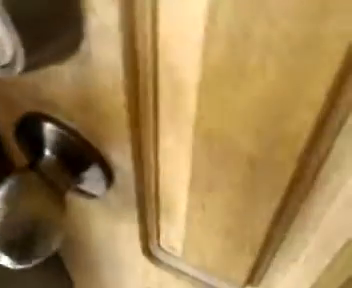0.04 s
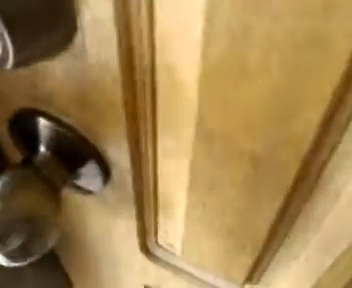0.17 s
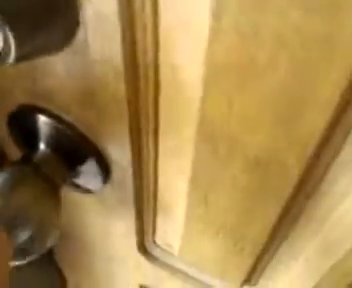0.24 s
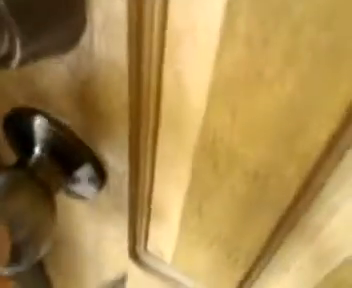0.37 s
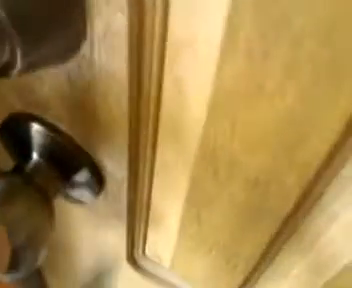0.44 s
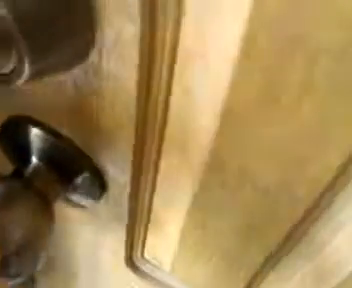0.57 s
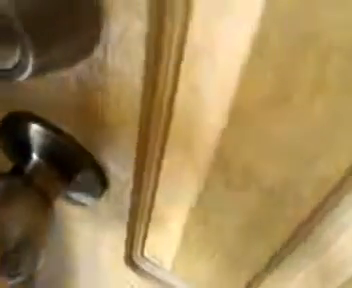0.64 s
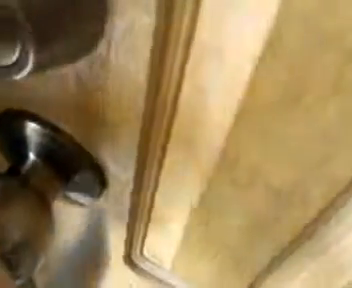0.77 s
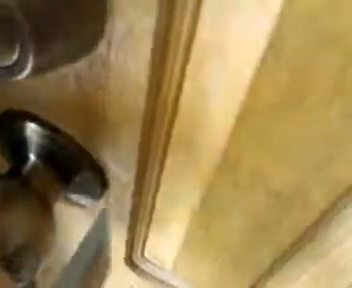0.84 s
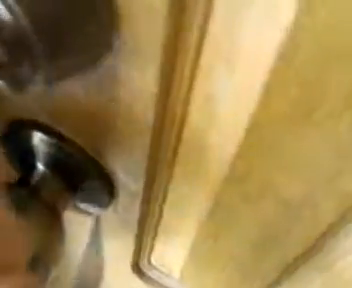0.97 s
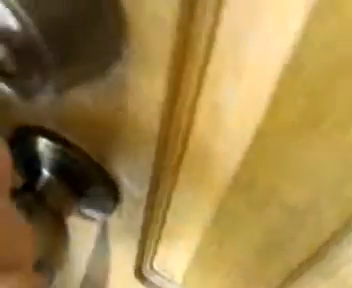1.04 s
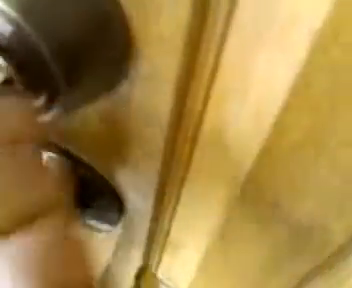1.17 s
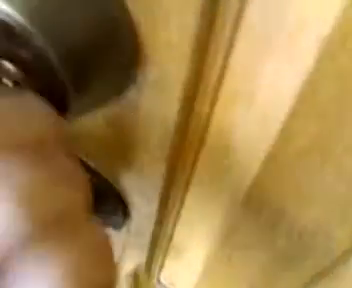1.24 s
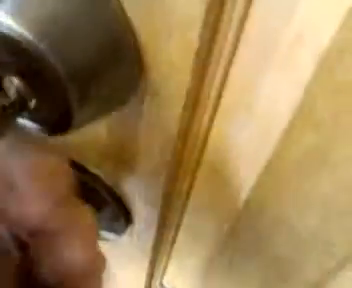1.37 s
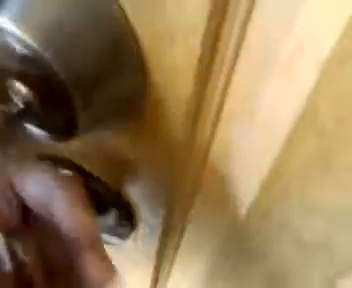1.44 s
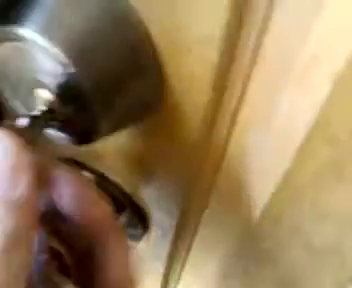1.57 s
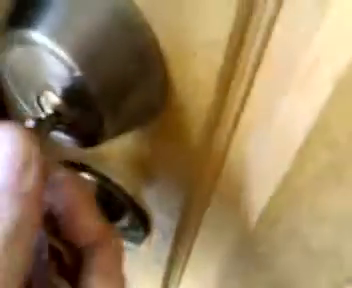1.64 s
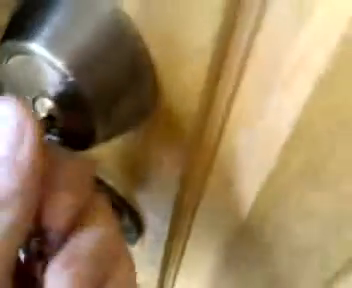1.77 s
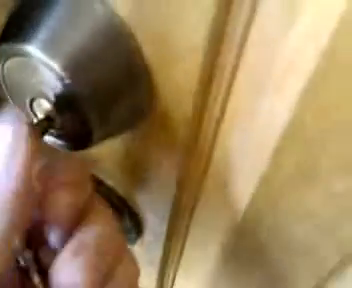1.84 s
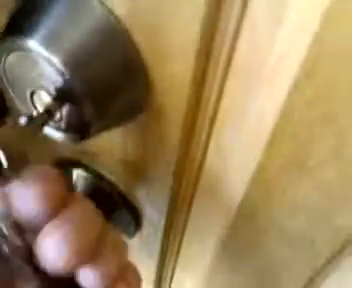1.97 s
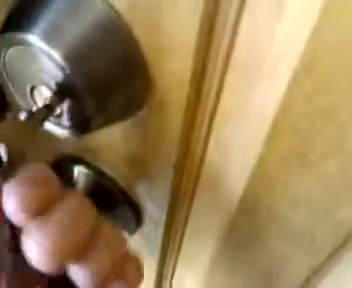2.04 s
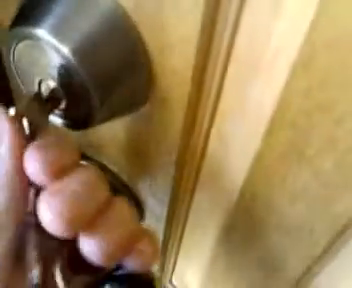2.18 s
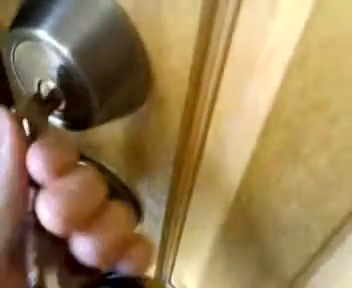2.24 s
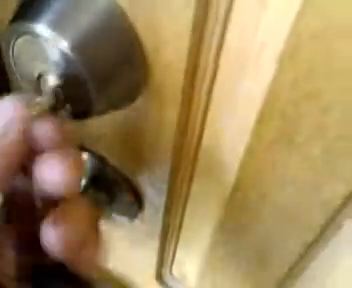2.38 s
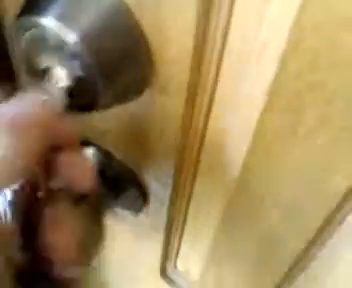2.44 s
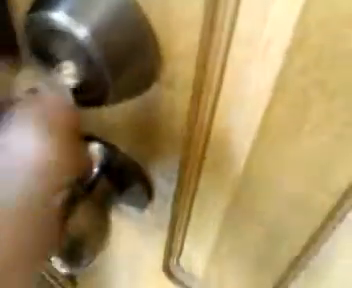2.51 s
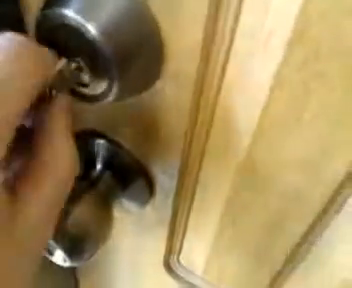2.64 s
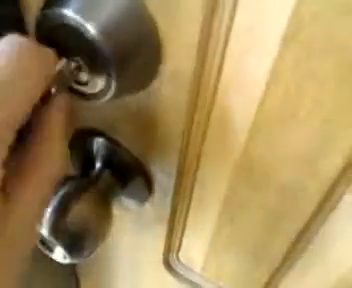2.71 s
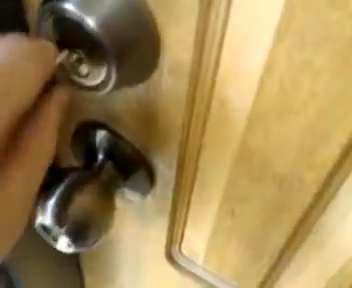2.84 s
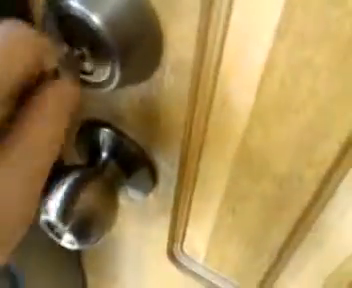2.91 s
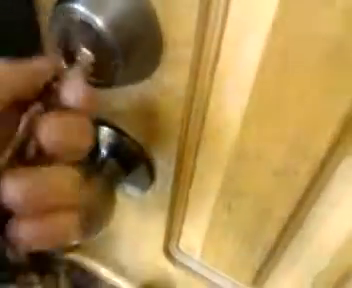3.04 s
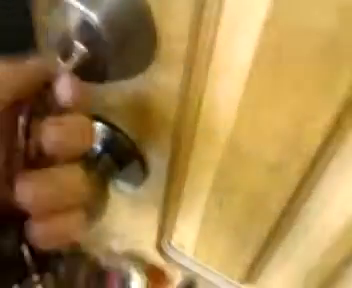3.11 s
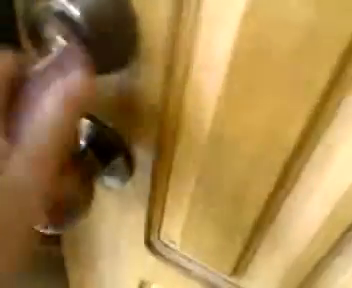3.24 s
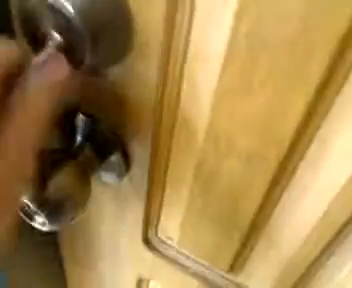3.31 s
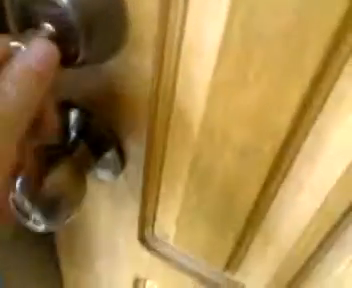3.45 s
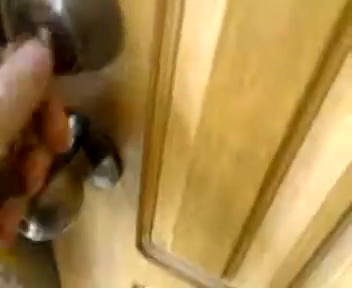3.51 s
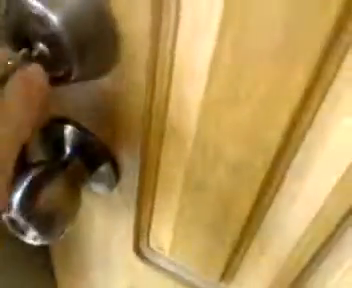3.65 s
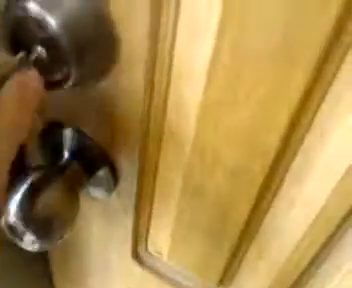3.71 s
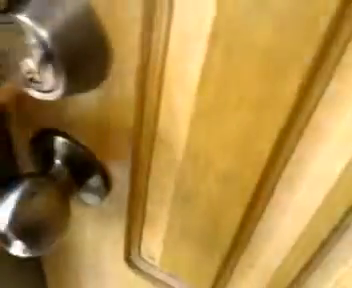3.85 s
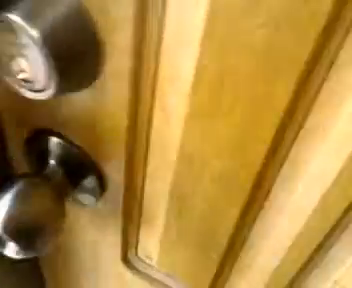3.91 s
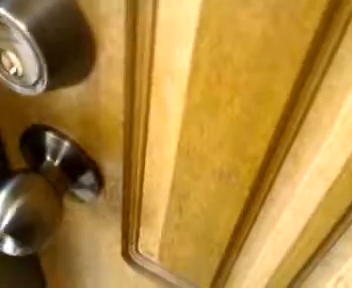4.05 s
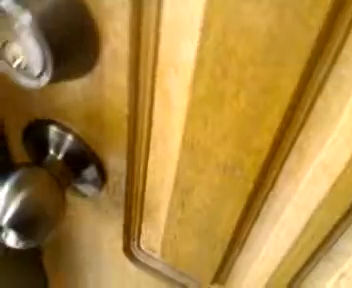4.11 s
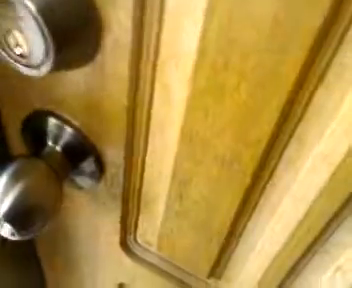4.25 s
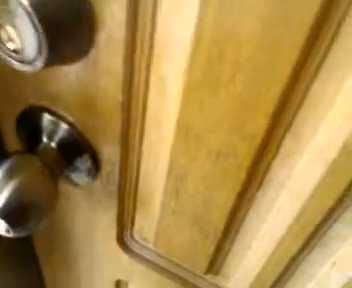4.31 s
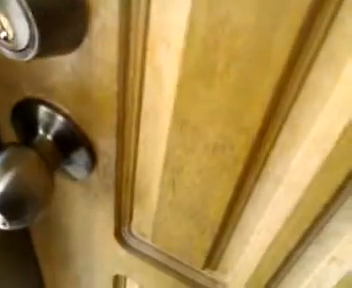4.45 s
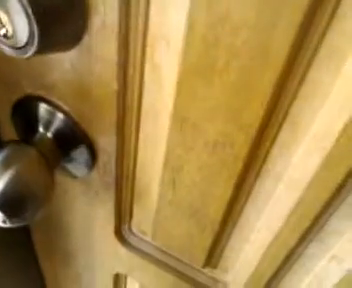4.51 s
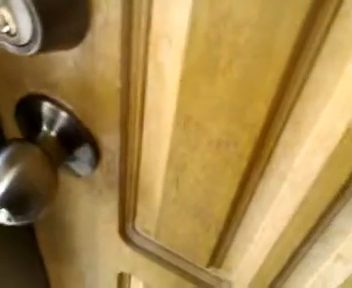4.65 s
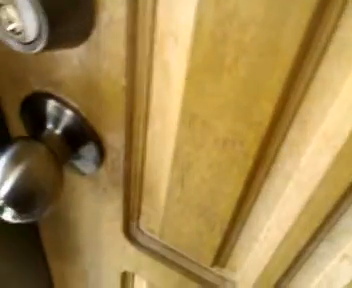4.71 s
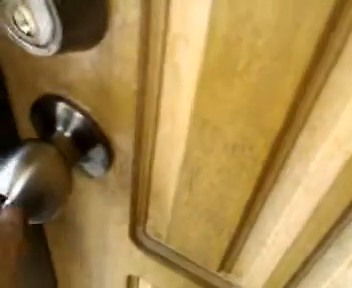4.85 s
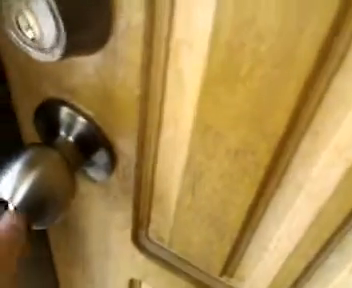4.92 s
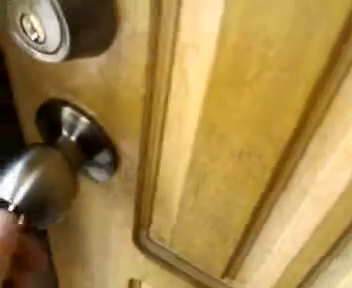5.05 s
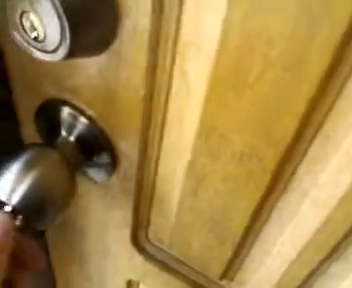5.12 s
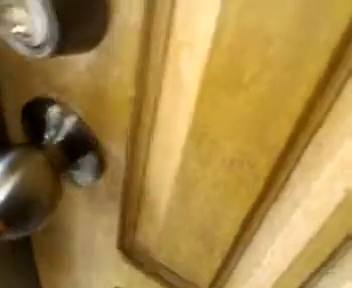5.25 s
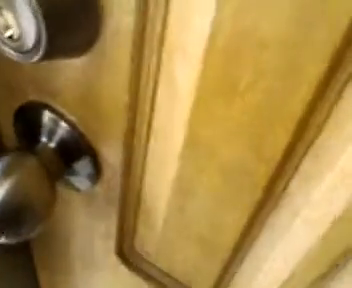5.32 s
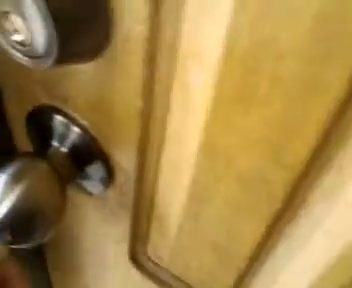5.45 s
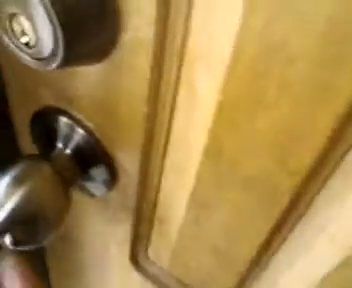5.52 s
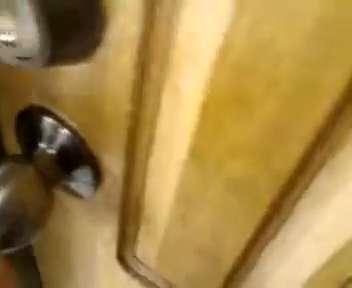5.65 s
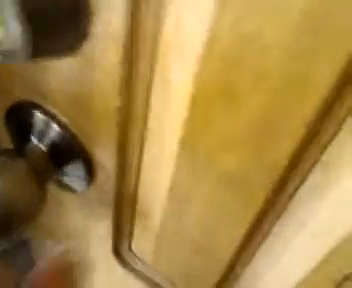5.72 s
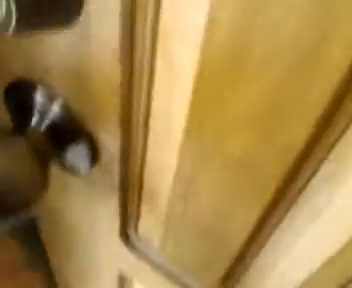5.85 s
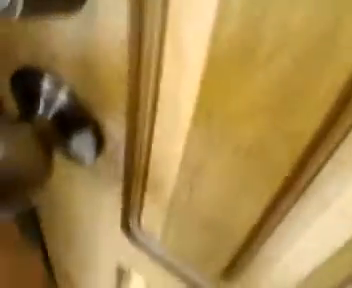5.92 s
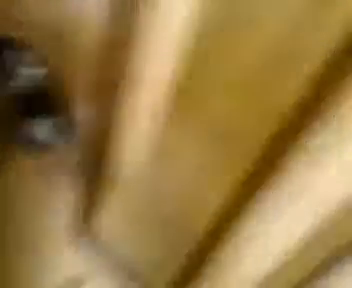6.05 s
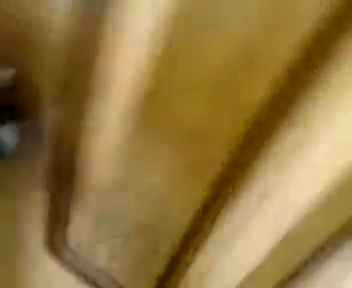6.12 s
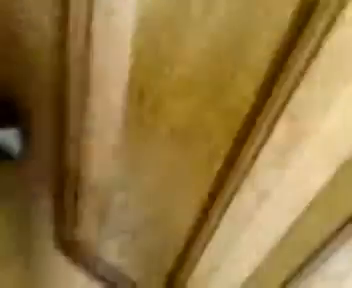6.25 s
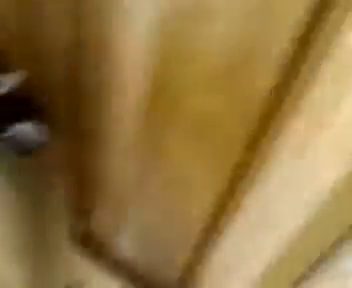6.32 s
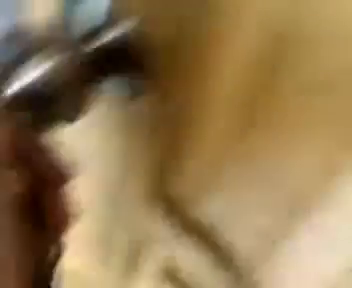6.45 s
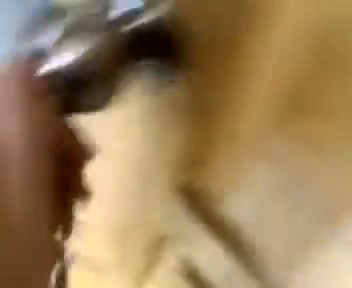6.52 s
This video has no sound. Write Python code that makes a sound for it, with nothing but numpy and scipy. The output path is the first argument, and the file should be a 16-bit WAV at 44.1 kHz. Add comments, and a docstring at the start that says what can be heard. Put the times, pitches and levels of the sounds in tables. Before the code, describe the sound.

Very close to a wooden door in quiet outdoor air, a few faint key clinks lead to small lock clacks and hand bumps. Keys jingle into the lock, the cylinder chirps briefly, and the bolt slams three times, ringing the door and overloading the dull microphone. Softer knob bumps and hollow scrapes follow, then a dense jingle of keys.

```python
"""Loose keys rustle faintly over quiet outdoor air, then tick and jingle in the locks of a wooden door.
The keys are short contacts ringing through resonances; the lock clacks with bursts of dying noise and modes.
Hands bump, rub and stroke the door in swells of noise; the cylinder chirps in short sine swells.
The bolt knocks hard on the door, ringing its modes and overloading the close microphone.
Later the door hardware scrapes as gritty slips feed hollow resonances, and the keys jingle again."""
import sys
import numpy as np
from scipy import signal
from scipy.fft import rfft
from scipy.io import wavfile

SR = 44100
rng = np.random.default_rng(int(sys.argv[2]) if len(sys.argv) > 2 else 0)


def file_out(sig):
    """Save sig as 16-bit WAV at sys.argv[1]."""
    # one column per channel
    cols = np.atleast_2d(sig).T
    # limit, then scale
    lim = np.clip(cols, -1, 1)
    pcm = np.round(lim * 32767).astype(np.int16)
    wavfile.write(sys.argv[1], SR, pcm)


N = 290178
AGE = np.arange(SR // 3) / SR  # time since a contact [s]

# Quiet outdoor air, colour: (frequency [Hz], density [dB per Hz])
AIR_COLOUR = [(40, 1.5), (190, -1), (500, -15), (800, -15), (1400, -15), (2100, -14.5), (3000, -23.5),
              (4200, -41.5), (5500, -26.5), (7200, -38.5)]
AIR_DB = -50.5

# How firmly the hands work, before each layer's trim: (time [s], level [dB])
HAND_MOTION = [(0.0, -55.5), (0.8, -47.5), (1.17, -43.5), (1.4, -28.5), (1.7, -48.5), (1.9, -38),
               (2.3, -34.5), (2.6, -43.5), (2.92, -45), (3.07, -36), (3.6, -47), (3.92, -31.5), (4.08, -39),
               (4.55, -43), (4.72, -39), (5.48, -37), (6.17, -51.5), (6.58, -42)]
# Handling rumble, colour: (frequency [Hz], density [dB per Hz])
RUMBLE_COLOUR = [(12, -15.5), (20, -3), (59, -5.5), (248, -21), (312, -17), (335, -46), (414, -21),
                 (458, -39.5), (600, -22.5), (780, -63), (1320, -120)]
# Skin rubbing, colour: (frequency [Hz], density [dB per Hz])
RUB_COLOUR = [(180, -0.5), (400, -1.5), (900, 0), (1500, 2), (2300, -11.5), (3300, -22.5), (7000, -37)]
# skin rubs as the hands push and as they turn the bunch
RUB_WITH_HANDS_DB, RUB_WITH_KEYS_DB = -20, -9

# How hard the loose keys brush one another, before each layer's trim: (time [s], level [dB])
KEY_SHAKE = [(0.0, -49.5), (0.97, -61), (1.45, -47.5), (1.6, -35.5), (1.92, -57), (2.29, -41), (2.5, -51),
             (2.75, -35.5), (2.93, -56.5), (3.3, -36), (3.5, -45), (3.9, -37), (4.07, -53.5), (4.7, -68),
             (5.15, -54), (5.6, -38.5), (6.04, -35.5), (6.11, -57.5), (6.58, -50)]
# Ringing modes of the keys: (frequency [Hz], level [dB], t60 [s])
KEY_MODES = [(2126, -7, 0.051), (2164, -16, 0.064), (3180, -4, 0.059), (3270, -10, 0.077),
             (5060, -16.5, .07), (5350, -8, 0.078), (5780, -6.5, 0.051), (6680, -16.5, 0.15),
             (7113, -7.5, 0.071)]
# The bunch in motion, colour: (frequency [Hz], density [dB per Hz])
JINGLE_COLOUR = [(530, -57), (900, -13.5), (1050, -1), (1750, 7), (2670, -3.5), (3240, -7), (4420, -9),
                 (5250, -23.5), (6310, -18.5), (6970, -14), (8000, -20), (10400, -56), (17600, -120)]

# A key strikes another key or the lock; brightness is low when the fingers damp the keys:
# (time [s], level before the keys' trim [dB], pitch [Hz], brightness [dB])
KEY_STRIKES = [(0.1378, -20.5, 2100, -1.5), (0.2478, -16.5, 1870, -9), (0.3359, -16, 2500, 2.5),
               (0.6212, -27, 1970, 1), (0.7392, -19, 1560, -8), (0.8971, -26, 1630, 10.5),
               (1.5544, -16, 2790, 8), (1.5633, -15, 2970, 6.5), (1.5757, -16, 1630, 2.5),
               (1.6104, -10, 3330, -3), (1.6206, -9, 2170, -1.5), (1.7806, -22, 2000, 5.5),
               (1.8252, -17.5, 3200, -2), (1.848, -15, 2020, -1), (1.9855, -25, 2140, 2),
               (2.0818, -8, 2240, -4.5), (2.154, -12, 2130, -3.5), (2.4462, -20, 1740, -3),
               (2.5927, -20, 1670, 5), (2.6072, -24.5, 1980, 13.5), (2.6377, -22.5, 1650, 13),
               (2.675, -20.5, 1930, 2), (3.1034, -19, 1670, -5), (3.1503, -15, 1910, -4),
               (3.2155, -18.5, 1800, -1), (3.2263, -15.5, 2110, 1.5), (3.2907, -15, 1960, -5),
               (3.2991, -5, 1800, -4), (3.315, -11.5, 1800, -19), (3.351, -19, 3240, -15.5),
               (3.598, -23, 2890, -7), (3.7227, -11.5, 1940, 3), (3.734, -5, 3020, 3.5),
               (3.7422, -5, 1720, -15), (3.7624, -15.5, 2080, -8), (3.9644, -15.5, 2240, 1.5),
               (4.0039, -20.5, 2270, 1), (4.0409, -16, 2610, 4), (4.4512, -28.5, 1980, 1.5),
               (5.2914, -20.5, 2340, -2), (5.5488, -14.5, 2320, 2), (5.5564, -17.5, 2340, 4),
               (5.566, -16.5, 2360, 4), (5.5995, -10.5, 2340, 0), (5.6122, -10.5, 3140, 0),
               (5.7163, -10, 2160, 0.5), (5.7646, -14, 1820, 2.5), (5.7826, -14.5, 2160, -8),
               (5.851, -13, 3140, 6), (5.8554, -4.5, 1900, -3), (5.8713, -9, 3160, -3),
               (5.8754, -10.5, 3240, 4), (5.899, -18.5, 1800, 7.5), (5.922, -15.5, 2130, 7),
               (5.9499, -11.5, 2360, -4), (5.9567, -10, 1940, 4.5), (5.9911, -13, 3020, -3),
               (6.0456, -3.5, 1670, -5), (6.0727, -20, 3380, 6.5)]
TICK_TREBLE_DB = -18.5  # bright edge of a strike, before its brightness and edge trim
SHIVER_DB = -14.5  # the rest of the bunch shivers, relative to the strike, before its brightness
# lighter strikes at random, and their middle level at 0 dB of shaking
STRAYS_PER_S, STRAY_ABOVE_DB, STRAY_SPREAD_DB = 13, -4.5, 6
STRAY_FOLLOWS = 0.49  # dB of a light strike per dB of shaking
LOWEST_KEY_HZ, HIGHEST_KEY_HZ = 1650, 2960

# Lock parts clack: (time [s], level before each part's trim [dB], dullness [dB])
LOCK_CLACKS = [(0.916, -8.5, 1.5), (1.066, -11, 1), (1.081, -8, 4.5), (1.103, -10, 1), (2.269, -17.5, 1),
               (2.304, -6, 2), (2.486, -21.5, 4), (2.828, -26, 18), (2.858, -27.5, 25), (2.909, -18, 27.5),
               (3.741, -12.5, 6), (3.875, -18, 7), (4.524, -22, -2), (4.969, -20, -2.5),
               (5.438, -11.5, 10.5)]
CLACK_T60_S, CLACK_EDGE_DB, CLACK_WOOD_DB = 0.13, -11, -27  # edge and wood before dullness
WOOD_PER_DULLNESS = 0.32  # a dull blow loses metal edge and gains this share in wood
# The door with its lock, modes: (frequency [Hz], level [dB], t60 before any damping [s])
DOOR_MODES = [(145.5, -21, 0.46), (200, -16, 0.21), (253, -27, 0.52), (370.6, -19, 0.3),
              (411.5, -15.5, 0.37), (475.6, -16.5, 0.34), (570, -6.5, .17), (712, -19, 0.065),
              (751.5, -9, 0.27), (925, -3.5, 0.096), (990, 2.5, 0.042), (1133, 4.5, 0.077),
              (1217, -3, 0.083), (1415, 2.5, 0.098), (1453, -11.5, 0.13), (1520, -19.5, .14),
              (1563, 2.5, 0.078), (1656, -9, 0.14), (1683, -22, 0.074), (2100, -19.5, 0.31),
              (2130, -20, 0.49), (2700, -25, .11), (2510, -11, 0.081)]

# Dull bumps of the hand on door and knob; brush is how much the skin slides:
# (time [s], level before each part's trim [dB], length [s], brush [dB])
HAND_BUMPS = [(1.242, -16, 0.026, -1.5), (1.378, -11, 0.027, 1), (1.863, -17, 0.029, 2),
              (2.093, -20, 0.022, -8.5), (2.193, -27.5, .04, -11), (2.28, -18, 0.038, 4),
              (3.041, -25, 0.023, 5.5), (3.074, -26, 0.019, 5.5), (3.885, -22, 0.025, -6),
              (4.083, -24.5, 0.021, -29), (4.186, -29, 0.019, -4), (4.665, -17, 0.015, -0.5),
              (4.691, -16, 0.014, -3), (4.752, -19, 0.019, -1), (4.831, -20.5, 0.021, -6),
              (4.963, -14.5, 0.018, 4.5), (5.178, -18.5, .028, 1.5), (5.206, -20, 0.018, 1),
              (5.383, -13, 0.023, -3.5), (5.499, -18, 0.026, -1), (5.957, -19, 0.025, 0.5),
              (6.29, -30.5, .03, 6), (6.557, -20.5, .011, 10.5)]
# Dull push on the wood, colour: (frequency [Hz], density [dB per Hz])
THUD_COLOUR = [(35, 7.5), (60, -6), (140, 6), (280, -1), (520, -3.5), (750, -14), (1500, -34.5)]
# Rasping metal, colour: (frequency [Hz], density [dB per Hz])
RASP_COLOUR = [(1500, -10), (1900, 8), (2800, 1.5), (3700, -8.5), (5400, -13), (7000, -22.5)]

# Fingers and keys brush across the lock, levels before trim:
# (time [s], length [s], rub [dB], rasp [dB])
LOCK_STROKES = [(1.289, 0.067, -31, -30.5), (1.963, 0.023, -36.5, -54), (2.708, 0.023, -43, -38),
                (2.775, 0.11, -37.5, -52), (2.932, 0.056, -39.5, -52), (3.598, 0.065, -39, -40.5),
                (3.867, 0.11, -35, -35.5), (4.865, .14, -34, -41.5), (5.143, 0.02, -40, -42),
                (5.282, 0.086, -43, -36.5), (5.344, 0.047, -28.5, -34.5), (5.458, 0.016, -34.5, -60),
                (5.537, .05, -38, -29.5), (5.665, 0.028, -31.5, -43), (6.219, .04, -44, -51),
                (6.443, 0.041, -34, -45)]
STROKE_ATTACK_S, STROKE_RELEASE_S = 0.0068, 0.018

# The turning cylinder chirps: (time [s], pitch [Hz], peak [dB], length [s])
CYLINDER_CHIRPS = [(2.261, 1555, -24.5, 0.02), (2.3054, 1533, -9, 0.013)]

# The bolt hits its stop: (time [s], force [dB], bass of the first blow [dB], loss per rebound [dB])
BOLT_BLOWS = [(2.737, -0.5, -2, 5.5), (3.404, 3.5, 3.5, 8), (3.8237, -0.5, -5, 15)]
# The blow and its three rebounds: (delay [s])
BOLT_BOUNCES = [0, .007, .025, .04]
# Dense ring of the bolt and its case, colour: (frequency [Hz], density [dB per Hz])
BOLT_RING_COLOUR = [(130, -36), (220, -4.5), (600, -10), (1100, -1), (1600, -3.5), (2100, -5.5),
                    (2650, -5.5), (3200, -22.5), (5300, -26.5), (7000, -41.5)]
BOLT_T60_S, BOUNCE_BASS_DB = 0.13, 4  # each rebound is duller than the last

# Door hardware scrapes in short slips: (time [s], level before the scrape trim [dB])
HARDWARE_SLIPS = [(4.547, -26), (4.691, -25), (4.808, -23), (4.87, -23.5), (4.915, -30.5), (4.943, -19),
                  (4.969, -15), (5.047, -37.5)]
# Hollow resonances of the scraping hardware: (frequency [Hz], width [Hz], level [dB])
HOLLOW_MODES = [(565, 36, -11), (900, 73, 11.5), (967, 36, 16), (998, 46, 13.5), (1174, 58, 6.5),
                (1350, 330, -8.5), (1900, 1300, -15)]
SLIP_S = 0.022

MIC_TOP_HZ, CUTOFF_HZ = 7460, 17500  # top of the microphone's band, edge of final silence


def from_db(db):
    """Decibels to gain."""
    return 10 ** (np.asarray(db) / 20)


def rms_one(x):
    """Scales to rms 1."""
    return x / np.sqrt(np.mean(x ** 2) + 1e-20)


def in_time(rows):
    """Joins the points of a level curve by straight lines, sample by sample."""
    s, db = np.transpose(rows)
    return np.interp(np.arange(N) / SR, s, db)


def fade(t60):
    """Falls by 60 dB in t60, kept to at least 2 ms."""
    return 1000.0 ** (-AGE / max(t60, .002))


def swell(length):
    """A soft contact: quick rise, slower fall, with its top at half the length."""
    u = AGE / max(length, .004) * 2
    return u * np.exp(1 - u)


def add(track, s, sound):
    """Mixes a sound in at time s."""
    start = int(np.clip(s * SR, 0, N - 1))
    track[start:start + len(sound)] += sound[:N - start]


def colour(x, spectrum):
    """Shapes a steady signal by a spectrum that falls away past its ends; rms 1."""
    hz, db = np.transpose(spectrum)
    f = np.maximum(np.fft.rfftfreq(len(x), 1 / SR), 1)
    skirts = np.minimum(f / hz[0], 1) ** 2 * np.minimum(hz[-1] / f, 1) ** 2
    gain = from_db(np.interp(np.log(f), np.log(hz), db)) * skirts
    return rms_one(np.fft.irfft(rfft(x) * gain, len(x)))


def noise(spectrum, size=len(AGE)):
    """Smooth noise of a given colour."""
    return colour(rng.standard_normal(size), spectrum)


def grit(per_s, spread_db, size):
    """Tiny contacts at random moments, a few much stronger than the rest; rms 1."""
    strength = from_db(spread_db * np.minimum(rng.exponential(1, size), 2.5))
    touching = rng.random(size) < per_s / SR
    return rms_one(touching * strength * rng.choice([-1, 1], size))


def friction(spectrum, size=len(AGE), per_s=1300):
    """Surfaces catch and slip in a dense, uneven grain."""
    return colour(grit(per_s, 2.45, size) + .5 * rng.standard_normal(size), spectrum)


def resonate(x, hz, width):
    """A two-pole resonance with gain near 1 on top."""
    r = np.exp(-np.pi * width / SR)
    zeros = np.array([1, 0, -1]) * (1 - r * r) / 2
    poles = [1, -2 * r * np.cos(2 * np.pi * hz / SR), r * r]
    return signal.lfilter(zeros, poles, x + 1e-18)


def struck(modes, damping=1.0):
    """Every blow excites each decaying mode with a strength and sign of its own."""
    draws = rng.uniform(.65, 1, len(modes)) * rng.choice([-1, 1], len(modes))
    ring = np.zeros(len(AGE))
    for draw, (hz, db, t60) in zip(draws, modes):
        ring += draw * from_db(db) * np.sin(2 * np.pi * hz * AGE) * fade(t60 / damping)
    return ring


def dying(spectrum, t60):
    """Many close modes dying together as fading noise, always with the same energy."""
    envelope = fade(t60)
    return rms_one(noise(spectrum) * envelope) * np.sqrt(np.mean(envelope ** 2))


def porch(x, wet_db=-13, t60=0.094, gap=0.0044):
    """Near walls answer with a short scatter of echoes after a brief gap."""
    echoes = noise([(150, -12.5), (1000, -2.5), (3000, -0.5), (7000, 2.5)]) * fade(t60) * (AGE > gap)
    return x + from_db(wet_db) * signal.fftconvolve(x, echoes / np.linalg.norm(echoes))[:N]


def outdoor_air():
    """Steady coloured noise stands for the quiet air outdoors."""
    return from_db(AIR_DB) * noise(AIR_COLOUR, size=N)


def handling(motion_db, shake_db):
    """Low rumble follows the hands; skin friction follows both the hands and the keys."""
    rub_gain = from_db(motion_db + RUB_WITH_HANDS_DB) + from_db(shake_db + RUB_WITH_KEYS_DB)
    rubbing = rub_gain * friction(RUB_COLOUR, size=N)
    return rubbing + from_db(motion_db - 1.0) * noise(RUMBLE_COLOUR, size=N)


def jingle(shake_db, per_s=450, gain_db=-2, ring_db=-10):
    """Loose keys brush one another: coloured small touches, with sparser ones ringing the key modes."""
    touches = rms_one(resonate(grit(per_s, 11.0, N), 3000, 5400))
    rings = np.zeros(N)
    for hz, db, t60 in KEY_MODES:
        width = np.log(1000) / (np.pi * t60)
        rings += from_db(db) * rms_one(resonate(grit(65, 17, N), hz, width))
    brushing = colour(porch(touches, wet_db=2.0, t60=0.026), JINGLE_COLOUR)
    return from_db(shake_db + gain_db) * (brushing + from_db(ring_db) * rms_one(rings))


def key_tick(hz, treble_db, width_hz=560, sing_db=-3, sing_width_hz=150, upper_hz=3250, upper_db=-5,
             edge_db=7, chatter=0.045, chatter_t60=0.048):
    """A key touches, rebounds twice within two milliseconds and chatters out; the hand damps its ring."""
    contact = chatter * grit(3300, 2.8, len(AGE)) * fade(chatter_t60)
    rebounds = (np.cumsum(rng.uniform(.0004, .001, 2)) * SR).astype(int)
    contact[0] = .8
    contact[rebounds] = rng.choice([-1, 1], 2) * [1, .7]
    # the blade's lowest mode sings on a little longer than the rest
    blade = resonate(contact, hz, width_hz) + from_db(sing_db) * resonate(contact, hz, sing_width_hz)
    body = blade - from_db(upper_db) * resonate(contact, upper_hz, 1300)
    treble = resonate(contact, 5080, 980) - 0.36 * resonate(contact, 6950, 400)
    edge = from_db(treble_db + edge_db) * treble
    band = signal.butter(2, [1200, 7200], "band", fs=SR, output="sos")
    tick = signal.sosfilt(band, body + edge)
    # every tick carries the same energy, referred to 3 ms
    return tick / (2 * np.sqrt(np.sum(tick ** 2) / (.003 * SR)))


def stray_ticks(shake_db):
    """Light strikes fall once per time slot, stronger the harder the bunch is shaken: KEY_STRIKES rows."""
    slots = np.arange(200)
    when, strength, key = rng.random((len(slots), 3)).T
    s = (slots + when) / STRAYS_PER_S
    shaking = np.interp(s * SR, np.arange(N), shake_db)
    db = STRAY_ABOVE_DB + STRAY_FOLLOWS * shaking + STRAY_SPREAD_DB * (2 * strength - 1)
    hz = LOWEST_KEY_HZ * (HIGHEST_KEY_HZ / LOWEST_KEY_HZ) ** key
    return [row for row in zip(s, db, hz, np.zeros(len(s))) if row[0] < N / SR]


def keys(shake_db, tick_db=-4, ring_db=-9, shiver_t60=0.067):
    """Each tick shakes the rest of the bunch and leaves a thin ring."""
    out = np.zeros(N)
    for s, db, hz, bright_db in list(KEY_STRIKES) + stray_ticks(shake_db):
        tick = key_tick(hz, TICK_TREBLE_DB + bright_db)
        after = dying(JINGLE_COLOUR, shiver_t60) + from_db(ring_db) * struck(KEY_MODES)
        add(out, s, from_db(db + tick_db) * (tick + from_db(SHIVER_DB + bright_db) * after))
    return out


def clacks(case_db=-12, door_db=-21, snap_db=-6, snap_hz=1750):
    """Light blows in the lock: a snap with a bright edge, the ring of the case and some wood."""
    case_colour = [(700, -5.5), (1000, 6.0), (1650, 8.5), (2600, 2.0), (3400, -15), (6000, -53.5)]
    wood_colour = [(130, 3.5), (450, -2.0), (750, 1.5), (1200, -11.5)]
    edge_colour = [(2800, 7.5), (3500, 13.5), (4500, 3.5), (5400, 6.5), (7200, -12.0)]
    out = np.zeros(N)
    for s, db, dullness in LOCK_CLACKS:
        wood_db = db + CLACK_WOOD_DB + WOOD_PER_DULLNESS * dullness
        edge_db = db + CLACK_EDGE_DB - dullness
        snap = from_db(db + snap_db) * key_tick(snap_hz, -35.5)
        case = from_db(db + case_db) * dying(case_colour, CLACK_T60_S)
        panel = from_db(wood_db) * dying(wood_colour, CLACK_T60_S * 1.65)
        metal = from_db(edge_db) * dying(edge_colour, CLACK_T60_S * 0.24)
        door = from_db(db + door_db) * struck(DOOR_MODES)
        add(out, s, snap + case + panel + metal + door)
    return out


def bumps(thud_db=-11, rub_db=-19, rasp_db=-28, sway_db=-17, sway_s=0.074):
    """Dull pushes on the door, each with a brush of skin, a rasp of metal and a slower, low sway."""
    out = np.zeros(N)
    for s, db, length, brush_db in HAND_BUMPS:
        skin = from_db(rub_db) * friction(RUB_COLOUR)
        metal = from_db(rasp_db) * friction(RASP_COLOUR, per_s=980)
        thud = from_db(thud_db) * noise(THUD_COLOUR)
        push = swell(length) * (thud + from_db(brush_db) * (skin + metal))
        sway = from_db(sway_db) * swell(sway_s) * noise(RUMBLE_COLOUR)
        add(out, s - .004, from_db(db) * (push + sway))  # the swell starts a little early
    return out


def strokes(rub_db=-2, rasp_db=-2):
    """Skin rubs and metal rasps for as long as a stroke lasts, then die away."""
    out = np.zeros(N)
    for s, length, rub, rasp in LOCK_STROKES:
        release = np.exp(-np.maximum(AGE - length, 0) / STROKE_RELEASE_S)
        envelope = np.minimum(AGE / STROKE_ATTACK_S, 1) * release
        skin = from_db(rub + rub_db) * friction(RUB_COLOUR, per_s=940)
        metal = from_db(rasp + rasp_db) * friction(RASP_COLOUR, per_s=650)
        add(out, s, envelope * (skin + metal))
    return out


def squeak(sharpness=1.3):
    """Metal slipping on metal sings for a few milliseconds as a swelling sine."""
    out = np.zeros(N)
    for s, hz, db, length in CYLINDER_CHIRPS:
        add(out, s, from_db(db) * swell(length) ** sharpness * np.sin(2 * np.pi * hz * AGE))
    return out


def bolt(door_db=-10, case_db=-9, crack_db=-16, crack_t60=0.019):
    """The bolt slams against its stop, rebounds and sets the whole door ringing."""
    low = signal.butter(1, 600, fs=SR, output="sos")
    out = np.zeros(N)
    for s, force_db, first_bass_db, loss in BOLT_BLOWS:
        for k, delay in enumerate(BOLT_BOUNCES):
            bass_db = first_bass_db + BOUNCE_BASS_DB * k
            door = from_db(door_db) * struck(DOOR_MODES, damping=1.31)
            blow = door + from_db(case_db) * dying(BOLT_RING_COLOUR, BOLT_T60_S)
            blow = blow + (from_db(bass_db) - 1) * signal.sosfilt(low, blow)  # low shelf
            crack = from_db(crack_db) * dying([(1000, 6), (3800, -9), (7000, -44)], crack_t60)
            add(out, s + delay, from_db(force_db - loss * k) * (blow + crack))
    return out


def scrapes(gain_db=-8.5):
    """Rough slipping feeds a cluster of hollow resonances."""
    out = np.zeros(N)
    for s, db in HARDWARE_SLIPS:
        slips = grit(1200, 2.7, len(AGE))
        hollow = np.zeros(len(AGE))
        for k, (hz, width, level) in enumerate(HOLLOW_MODES):
            hollow += (-1) ** k * from_db(level) * resonate(slips, hz, width)  # alternating sign
        add(out, s - .003, from_db(db + gain_db) * swell(SLIP_S) * rms_one(hollow))
    return out


def scene():
    """Keys, lock and hands over quiet outdoor air; near walls answer the key strikes and clacks."""
    shake_db, motion_db = in_time(KEY_SHAKE), in_time(HAND_MOTION)
    hands = handling(motion_db, shake_db) + bumps() + strokes()
    echoed = porch(keys(shake_db) + clacks())
    metal = jingle(shake_db) + squeak() + bolt() + scrapes()
    return (outdoor_air() + hands + echoed + metal)[None]


def record(dry, top=0.66, leak_db=-7):
    """A dull microphone whose loudest peaks flatten in overload."""
    dull = signal.sosfilt(signal.butter(14, MIC_TOP_HZ, fs=SR, output="sos"), dry)
    flat = dull / (1 + (dull / top) ** 10) ** (1 / 10)
    narrow = signal.sosfiltfilt(signal.butter(10, 7700, fs=SR, output="sos"), flat)
    # above the microphone's band there is little but some overload
    harsh = from_db(leak_db) * (flat - dull)
    splash = signal.sosfilt(signal.butter(4, 7700, "high", fs=SR, output="sos"), harsh)
    return signal.sosfilt(signal.cheby2(12, 70, CUTOFF_HZ, fs=SR, output="sos"), narrow + splash)


dry = scene()
out = record(dry)
file_out(out)
```